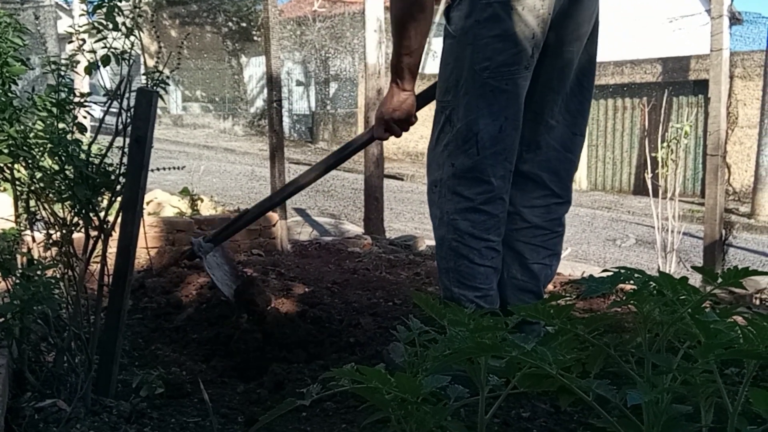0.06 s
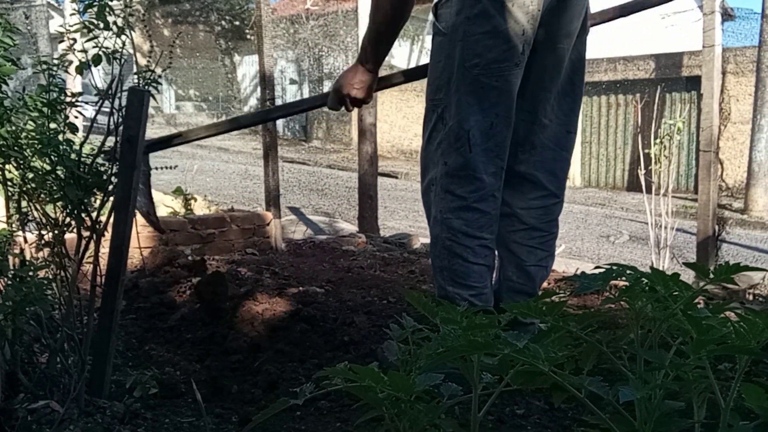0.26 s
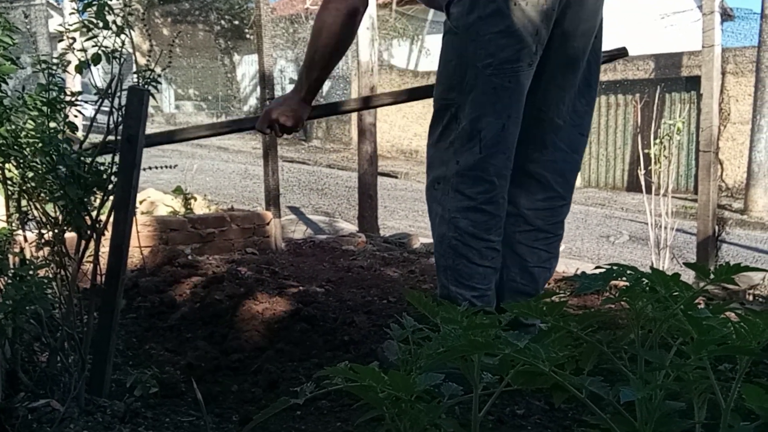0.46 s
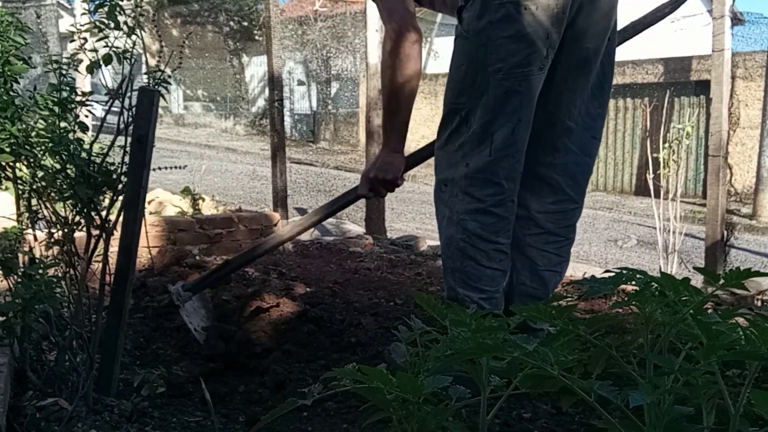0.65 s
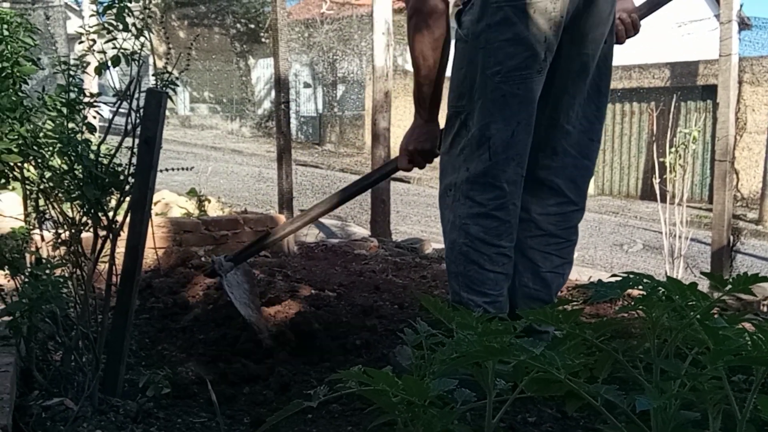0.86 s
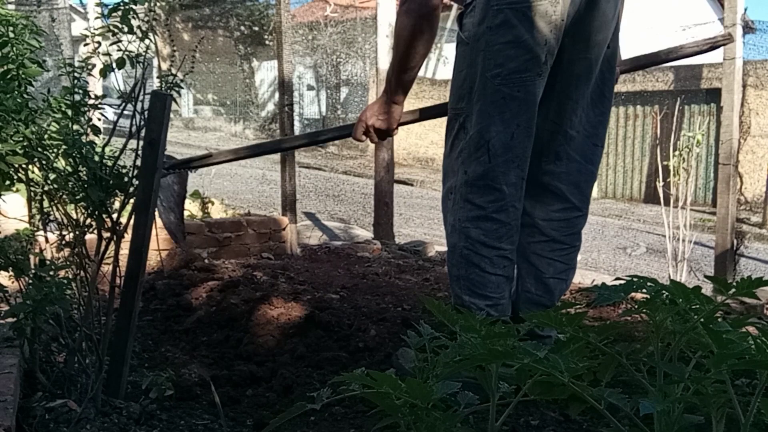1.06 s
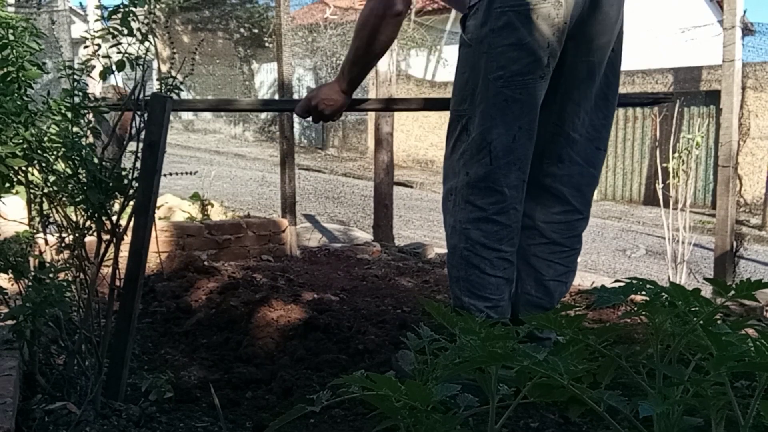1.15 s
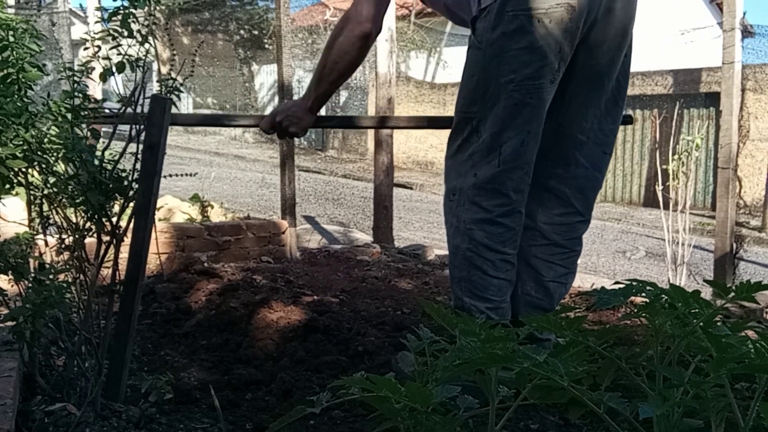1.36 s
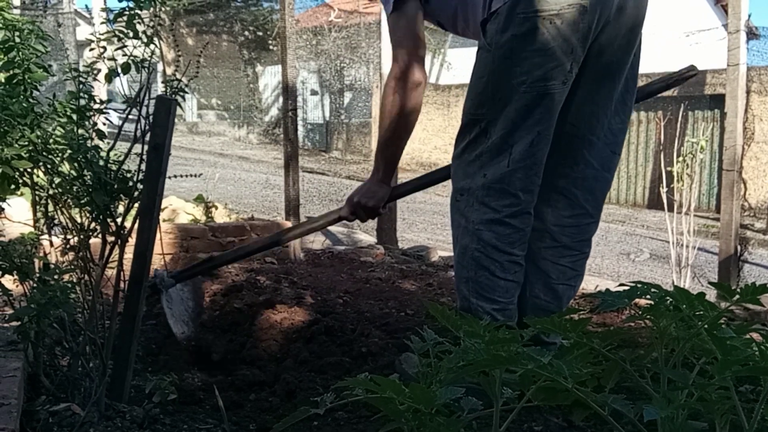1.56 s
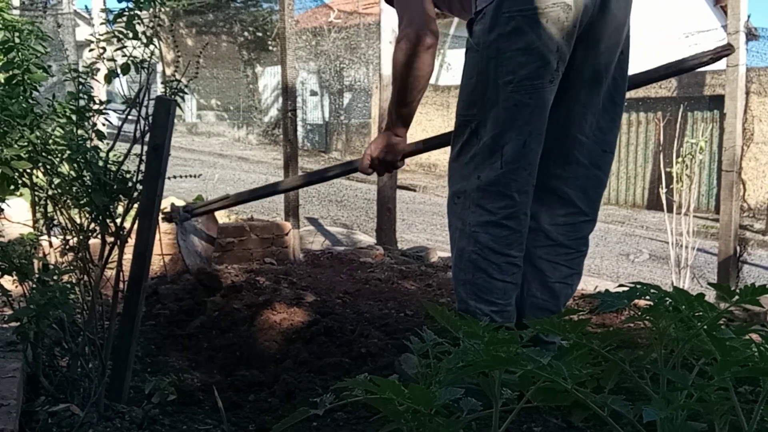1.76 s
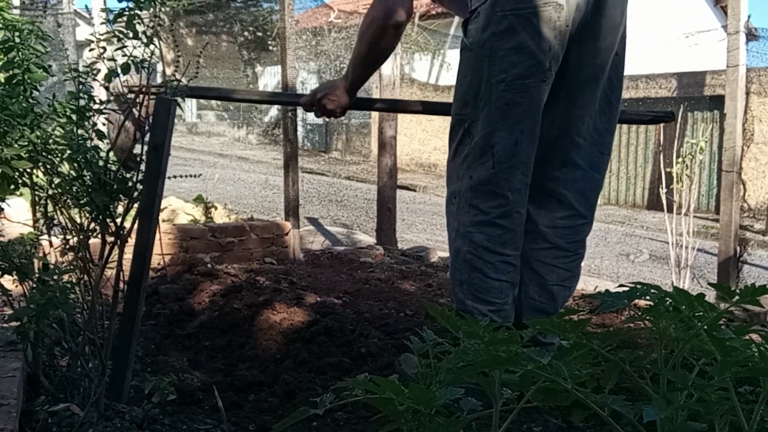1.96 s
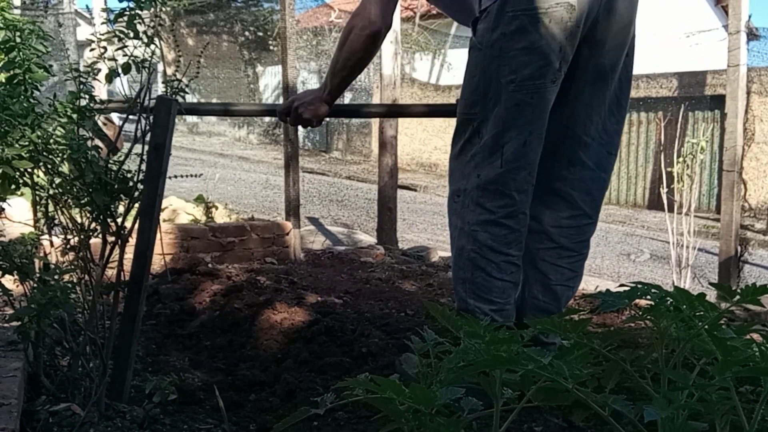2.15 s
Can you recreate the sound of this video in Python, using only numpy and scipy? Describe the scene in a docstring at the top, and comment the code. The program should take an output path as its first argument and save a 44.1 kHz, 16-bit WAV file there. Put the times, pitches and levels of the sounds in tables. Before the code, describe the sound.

A hoe chops damp, gritty soil at about 0.23, 1.08 and 1.93 seconds. Each stroke is a bright, short crunch with dry metallic ticks and a dull thud; the first trails crumbs until 0.5, and light scraping follows the later two. Quiet background: hiss, leaves, swelling low street rumble, a far bird rasping near 0.03, 0.6, 1.5 and 2.1, thin whistles from 0.5 to 1.1. Outdoor stereo, left louder.

```python
"""A garden bed near a street: a hoe chops three times into damp soil.
Clumped grains of grit crunch and ring the blade; stones strike its modes; clods thud and crumbs fall back.
A far bird rasps in noise puffs through a throat; a small one whistles in thin, blurred glides.
Filtered noise makes the swelling street rumble, soft hiss and stirring leaves.
Two microphone ports hear it all, the left one louder and a millisecond late."""
import sys
import numpy as np
from scipy import signal
from scipy.io import wavfile
from scipy.ndimage import uniform_filter1d

SR = 44100
rng = np.random.default_rng(int(sys.argv[2]) if len(sys.argv) > 2 else 0)


def pcm_store(signal):
    """Save signal as 16-bit PCM."""
    levels = np.round(np.clip(np.atleast_2d(signal), -1, 1) * 32767)
    wavfile.write(sys.argv[1], SR, levels.astype(np.int16).T)


def gain_from_db(level_db):
    """Convert decibel levels to linear amplitude factors (20 dB per decade)."""
    decades = np.asarray(level_db, float) / 20
    return 10 ** decades


N = 97020  # samples, 2.2 s

# The blade cutting through grit, then crumbs raining back; one list per chop.
# Each row: time in seconds, relative level in dB, tilt in dB per octave about 5 kHz.
CHOP_CURVES = [
    [(.216, -58, -5), (.223, -36.5, 7), (.230, -29, 0), (.234, -23.5, 2.5), (.250, -28.5, -1),
     (.260, -30, -1.5), (.272, -39, -2.5), (.32, -46, -2), (.38, -50.5, -1.5), (.43, -62.5, -2.5),
     (.462, -54, -1), (.51, -62.5, -0.5), (.575, -76, -8)],
    [(1.0765, -27.5, 8.5), (1.0785, -29, 1), (1.088, -26.5, 2.5), (1.098, -28.5, 0), (1.112, -40, -4),
     (1.135, -48, -1), (1.148, -48.5, -5), (1.165, -53.5, -3), (1.26, -72.5, -2.5)],
    [(1.875, -63.5, 2.5), (1.886, -62, -3.5), (1.906, -69, -9), (1.9238, -58, -3), (1.9250, -29, 5),
     (1.936, -31, 3), (1.944, -46, -8), (1.961, -41, 2.5), (2.0, -66.5, -5), (2.11, -77, -2)],
]
# Colour of the grit. Each row: frequency in Hz, relative spectrum level in dB per Hz.
GRIT_COLOUR = [(150, -26.5), (330, -15), (790, -12), (1400, -7.5), (2400, -3.5), (4000, -4), (6600, -1),
               (8000, -1.5), (10500, -7), (13500, -20), (15600, -10), (16500, -32.5)]
# Stones ticking the blade. Each row: time in seconds, relative peak level in dB.
STONE_TICKS = [(.2325, -5), (.2385, -10), (.2555, -10), (.439, -37), (.459, -28), (.478, -36), (.5175, -37),
               (1.078, -13), (1.0855, -12), (1.0965, -13), (1.143, -33), (1.876, -41), (1.885, -40),
               (1.9252, -12), (1.9304, -13), (1.9340, -16), (1.9594, -30), (2.1236, -27)]
# Ringing modes of the blade. Each row: frequency in Hz, relative level in dB, struck decay t60 in seconds.
BLADE_MODES = [(2260, -8, 0.12), (3320, -13, .07), (4150, -6, .04), (4550, -3, 0.045), (5600, -10, .03),
               (6170, -6, .04), (6580, 0, .04), (7200, -7, .035), (7680, -9, .025), (10400, -14, .015),
               (15200, -16, .012)]
# Soil, clods and handle taking a blow.
# Each row: time in seconds, relative level in dB, pitch in Hz, decay t60 in seconds.
SOIL_THUDS = [(.238, -46.5, 243, 0.29), (.288, -35, 2190, .05), (.31, -52.5, 399, 0.55),
              (.594, -49, 215, 0.11), (.595, -51, 980, 0.08), (.596, -50, 520, .14),
              (.609, -49, 1090, 0.05), (1.081, -40, 600, .1), (1.082, -35, 316, 0.11),
              (1.082, -35, 1000, 0.06), (1.1, -47, 219, 0.22), (1.143, -38, 1310, 0.05),
              (1.927, -36, 950, 0.067), (1.928, -41, 1600, .05), (1.93, -42, 560, .07),
              (1.938, -33, 205, 0.09), (1.962, -36.5, 117, 0.1), (2.1233, -49, 2370, 0.11)]
# Soil sliding on the blade, humming in the modes near where it rubs.
# Each row: start in seconds, length in seconds, relative starting level in dB, focus in Hz.
SOIL_SCRAPES = [(1.258, 0.11, -61, 3730), (1.881, 0.037, -58, 2377), (1.989, 0.15, -62, 3660)]
# Calls of the far rasping bird.
# Each row: start in seconds, length in seconds, relative level in dB, throat scale as a factor.
RASP_CALLS = [(0.028, 0.2, -61, 1.017), (0.587, 0.21, -62.5, .99), (1.53, 0.08, -68, 1.12),
              (2.124, 0.068, -62.5, 1.14)]
# Throat resonances before scaling. Each row: frequency in Hz, width in Hz, relative level in dB.
THROAT_MODES = [(2850, 300, -13), (3750, 450, -5), (4200, 350, 0), (5000, 500, -13), (5950, 250, -11)]
# Thin whistles, each arching above a straight glide.
# Each row: start in seconds, length in seconds, relative level in dB, start pitch in Hz, end pitch in Hz.
WHISTLE_GLIDES = [(.54, .095, -74, 1600, 1950), (.735, .05, -69, 2700, 2620), (.7, .13, -75, 7050, 7150),
                  (.89, .09, -73, 7750, 7400), (.985, .09, -73, 6650, 5950), (1.02, .055, -77, 5900, 5100)]
# Colour of the hiss. Each row: frequency in Hz, relative spectrum level in dB per Hz.
HISS_COLOUR = [(90, -22.5), (150, 3), (480, -8), (2900, -22.5), (4500, -35.5), (7900, -29.5), (9100, -40),
               (13500, -44), (14700, -27.5), (15950, -24.5), (16800, -40.5)]
# Leaves stirring. Each row: time in seconds, relative level in dB.
LEAF_CURVE = [(0, -65), (.2, -73), (.62, -68), (.95, -83.5), (1.3, -66), (1.42, -83), (1.6, -67.5),
              (1.72, -72.5), (1.82, -79.5), (2.2, -67)]
# Colour of the leaves. Each row: frequency in Hz, relative spectrum level in dB per Hz.
LEAF_COLOUR = [(590, -55), (1050, -12.5), (3990, -4), (12000, -20.5), (15600, -54)]
# Colour of the street rumble. Each row: frequency in Hz, relative spectrum level in dB per Hz.
RUMBLE_COLOUR = [(14, -65), (30, -17), (76, 7), (131, 0), (166, -14.5), (296, -23.5), (600, -54)]
# Swells of the rumble. Each row: time in seconds, relative level in dB.
RUMBLE_SWELL = [(0, -64), (.08, -47), (.16, -69), (.43, -48.5), (.58, -54.5), (.85, -62.5), (.96, -54),
                (1.04, -69), (1.13, -52.5), (1.42, -67), (1.75, -53.5), (1.98, -55.5), (2.05, -66),
                (2.18, -52)]
# Tone of the left port against the right. Each row: frequency in Hz, gain in dB.
LEFT_TONE = [(40, 2.2), (300, 3.3), (2000, 6.8), (6500, 6.5), (9500, 1.5)]

GRAINS_PER_S, SIZE_SPREAD_DB, CLUMP_DB = 900, 3.5, 1.5  # grain rate at 2 kHz
GRAIN_CYCLES = 2.87  # cycles per unit of grain time
SPREAD_S = 0.00036  # grains land across the blade's width, shifting their arrival between the ports
TICK_DB, RING_DB = -11, -16.5  # stone level, grit heard through the blade
SHARPEN = 0.63  # dB per octave of brightness gained per 10 dB of force
THUD_RISE_S, THUD_FUZZ = 0.001, 0.87  # rise time constant, noise against tone
FOCUS_DB = -6  # scrape fall-off one octave from the focus
RASP_PER_S, RASP_FADE_S = 110, 0.033  # mean puff rate, fade-out (the fade-in takes half)
RASP_SAG, ARCH = .09, .045  # pitch fractions: throat sag, whistle arch
WHISTLE_BLUR_HZ = 68
HISS_DB = -63.5
SCATTER_DB, SCATTER_T60_S = -5, .01
YARD_DB, YARD_T60_S = -18, 0.2
NEAR_DB = 2  # lift of all bright sources at the ports
BIRD_LAG_S = .00011  # the birds sit further to the right
LAG_S, TRIM_DB = 0.001081, -2.5  # delay of the left port, level of the whole mix


def evened(x):
    """Scales to rms 1."""
    return x / np.sqrt(np.mean(x ** 2) + 1e-20)


def colour(x, points):
    """Causal minimum-phase filter with the given spectrum."""
    f, db = np.transpose(points)
    hz = abs(np.fft.fftfreq(8192, 1 / SR))
    gain_db = np.maximum(np.interp(np.log(hz + 1), np.log(f), db), -100)
    log_gain = gain_db * np.log(10) / 20
    # the Hilbert transform of the log gain gives the minimum phase
    taps = np.fft.ifft(np.exp(np.conj(signal.hilbert(log_gain)))).real[:4096]
    return signal.oaconvolve(x, taps)[:len(x)]


def add(mix, s, sound):
    """Mixes a sound in at s seconds."""
    part = mix[round(s * SR):][:len(sound)]
    part += sound[:len(part)]


def resonate(x, hz, width_hz):
    """A resonance of gain 1 that follows the curve hz."""
    turn = np.exp(2j * np.pi * np.cumsum(hz * np.ones(len(x))) / SR)
    r = np.exp(-np.pi * width_hz / SR)
    return 2 * (turn * signal.lfilter([1 - r], [1, -r], x / turn)).real


def wander(rate_hz):
    """Chance drift of rms 1: noise averaged twice over one period of rate_hz."""
    size = int(SR / rate_hz)
    return evened(uniform_filter1d(uniform_filter1d(rng.standard_normal(N), size), size))


def follow(points):
    """Gain along a level curve."""
    return gain_from_db(np.interp(np.arange(N) / SR, *np.transpose(points)))


def grit(count=28):
    """Grains of many pitches crack in clumps and ring the blade; tilt favours coarse or fine ones."""
    t, out = np.arange(N) / SR, np.zeros((2, N))
    rows = []
    for chop in CHOP_CURVES:
        # near-silence just before and after each chop
        rows += [(chop[0][0] - .004, -110, 0), *chop, (chop[-1][0] + .05, -110, 0)]
    s, db, slope = np.transpose(rows)
    level_db = np.interp(t, s, db) + CLUMP_DB * wander(330)
    tilt = np.interp(t, s, slope)
    for hz in np.geomspace(300, 16000, count):
        u = np.arange(0, 3, hz / GRAIN_CYCLES / SR)
        grain = u * np.exp(-3 * u) * np.sin(2 * np.pi * GRAIN_CYCLES * u)
        chance = GRAINS_PER_S * np.sqrt(hz / 2000) / SR
        hits = (rng.random(N) < chance) * rng.choice([-1, 1], N)
        hits = hits * gain_from_db(SIZE_SPREAD_DB * np.minimum(rng.exponential(1, N), 4))
        plain = evened(signal.oaconvolve(hits, grain)[:N])
        plain *= np.sqrt(hz / 5000 / count) * gain_from_db(level_db + tilt * np.log2(hz / 5000))
        shift = round(SPREAD_S * SR * rng.uniform(-1.1, 1))
        out += [plain, np.roll(plain, shift)]
    rung = np.zeros((2, N))
    for hz, db, t60 in BLADE_MODES:
        gain = gain_from_db(RING_DB + db / 2) * np.sqrt(t60 * 1000)
        rung += [gain * resonate(v, hz, 3.48 / t60) for v in out]
    unit = np.zeros(4096)
    unit[0] = 1
    # the filter is scaled to unit energy
    return np.array([colour(v, GRIT_COLOUR) for v in out + rung]) / np.linalg.norm(colour(unit, GRIT_COLOUR))


def ticks():
    """Each stone rings the blade's modes, a little differently at each spot."""
    out, t = np.zeros(N), np.arange(3000) / SR
    spots = rng.standard_normal((len(STONE_TICKS), len(BLADE_MODES)))
    for (s, db), luck in zip(STONE_TICKS, spots):
        ring = np.zeros(len(t))
        for (hz, mode_db, t60), r in zip(BLADE_MODES, luck):
            force_db = SHARPEN * db / 10 * np.log2(hz / 5000)
            decay = gain_from_db(mode_db + 3 * r + force_db - 60 * t / t60)
            ring += decay * np.sin(2 * np.pi * hz * (1 + 0.012 * r) * t)
        add(out, s, gain_from_db(db + TICK_DB) * ring / abs(ring).max())
    return out


def thuds():
    """A blow sets off a dull damped tone with narrow noise around it, rising fast and dying away."""
    out, t = np.zeros(N), np.arange(9000) / SR
    for s, db, hz, t60 in SOIL_THUDS:
        noise = rng.standard_normal(len(t))
        fuzz = evened(resonate(resonate(noise, hz, 0.25 * hz), hz, hz))
        body = np.sin(2 * np.pi * hz * t) + THUD_FUZZ * fuzz
        add(out, s, gain_from_db(db - 60 * t / t60) * (1 - np.exp(-t / THUD_RISE_S)) * body)
    return out


def scrapes():
    """Gritty noise drives the blade's modes while soil slides off."""
    out = np.zeros(N)
    spots = rng.standard_normal((len(SOIL_SCRAPES), len(BLADE_MODES)))
    for (s, length, db, focus_hz), luck in zip(SOIL_SCRAPES, spots):
        t = np.arange(0, length, 1 / SR)
        drive = rng.standard_normal(SR // 4)[:len(t)] ** 3  # cubing makes it spiky
        hum = np.zeros(len(t))
        for (hz, _, t60), r in zip(BLADE_MODES, luck):
            mode = evened(resonate(resonate(drive, hz, 5 / t60), hz, 41 / t60))
            hum += gain_from_db(2 * r + FOCUS_DB * np.log2(hz / focus_hz) ** 2) * mode
        fade = np.clip(np.minimum(t / 0.0058, (length - t) / 0.067), 0, 1)
        add(out, s, gain_from_db(db - 6.5 * t / length) * evened(hum) * fade)
    return out


def rasps():
    """Uneven puffs of noise pass through throat resonances that sag steadily in pitch."""
    out = np.zeros(N)
    for s, length, db, scale in RASP_CALLS:
        t = np.arange(0, length, 1 / SR)
        noise, jitter = rng.standard_normal((2, SR // 2))[:, :len(t)]
        turns = np.cumsum(RASP_PER_S * (1 + 3 * uniform_filter1d(jitter, 300))) / SR
        puffs = (1 + np.exp(-(turns % 1) / 0.43)) * noise
        bend = scale * (1 - RASP_SAG * t / length)
        voice = np.zeros(len(t))
        for hz, width, mode_db in THROAT_MODES:
            mode = resonate(resonate(puffs, hz * bend, width), hz * bend, 2 * width)
            voice += gain_from_db(mode_db) * evened(mode)
        fade = np.clip(np.minimum(2 * t, length - t) / RASP_FADE_S, 0, 1)
        add(out, s, gain_from_db(db) * evened(voice) * fade)
    return out


def whistles():
    """Gliding sines with narrow noise at the same pitch, blurred by distance."""
    out = np.zeros(N)
    for s, length, db, from_hz, to_hz in WHISTLE_GLIDES:
        u = np.arange(0, 1, 1 / SR / length)
        hz = (from_hz + (to_hz - from_hz) * u) * (1 + ARCH * np.sin(np.pi * u))
        noise = rng.standard_normal(SR // 2)[:len(u)]
        blur = evened(resonate(noise, hz, WHISTLE_BLUR_HZ))
        tone = blur + np.sin(2 * np.pi * np.cumsum(hz) / SR)
        add(out, s, gain_from_db(db) * evened(tone) * np.sin(np.pi * u) ** .5)
    return out


def rumble():
    """Low street noise swells in lumps, nearly alike at the two ports."""
    shared, a, b = (evened(colour(v, RUMBLE_COLOUR)) for v in rng.standard_normal((3, N)))
    return follow(RUMBLE_SWELL) * (shared + 0.13 * np.array([a, b]))


def air():
    """Coloured noise makes drifting hiss and crackling leaves, mostly unlike at the two ports."""
    a, b, shared = rng.standard_normal((3, N))
    crackle = gain_from_db(2.2 * wander(280))
    out = []
    for own in (a, b):
        hiss = gain_from_db(HISS_DB + 2 * wander(0.94)) * evened(colour(own + 0.24 * shared, HISS_COLOUR))
        # the same noise, shifted far enough to sound unrelated to the hiss
        leaves = evened(colour(np.roll(own, N // 3), LEAF_COLOUR))
        out.append(hiss + follow(LEAF_CURVE) * crackle * leaves)
    return np.array(out)


def ports(x):
    """Each port hears the direct sound, a quick scatter off ground and housing, and a faint yard tail."""
    t = np.arange(SR // 3) / SR
    scatter, yard = rng.standard_normal((2, 2, len(t))) * (t > .0001)
    scatter = scatter * gain_from_db(-60 * t / SCATTER_T60_S)
    # differencing thins out the bass of both
    yard = np.diff(yard, prepend=0) * gain_from_db(-60 * t / YARD_T60_S)
    early = gain_from_db(SCATTER_DB) * np.diff(scatter, prepend=0) / np.linalg.norm(np.diff(scatter[0]))
    late = gain_from_db(YARD_DB) * yard / np.linalg.norm(yard[0])
    taps = (t == 0) + early + late
    return signal.oaconvolve(x, taps, axes=1)[:, :N]


def scene():
    """Sums all sources at the right and left ports, then delays and tones the left one."""
    birds = rasps() + whistles()
    birds = np.array([birds, np.roll(birds, round(BIRD_LAG_S * SR))])
    # scraping shared by both ports, plus some that differs; the sum starts with the grit
    bright = grit() + ticks() + scrapes() + .5 * np.array([scrapes(), scrapes()]) + birds
    right, left = ports(gain_from_db(NEAR_DB) * bright + thuds()) + air() + rumble()
    lag = round(LAG_S * SR)
    late_left = np.r_[left[lag:0:-1], left[:-lag]]  # a mirrored start fills the gap
    return np.array([colour(late_left, LEFT_TONE), right]) * gain_from_db(TRIM_DB)


def band_limit(x):
    """A steep low-pass at the top of the band."""
    return signal.sosfilt(signal.butter(12, 17140, fs=SR, output="sos"), x)


def record(dry):
    """Rolls off the top above 16.9 kHz with a linear-phase filter to finish the mix."""
    mix = signal.oaconvolve(dry, signal.firwin(63, 16900, fs=SR)[None], "same")
    return band_limit(mix)


dry = scene()
out = record(dry)
pcm_store(out)
```